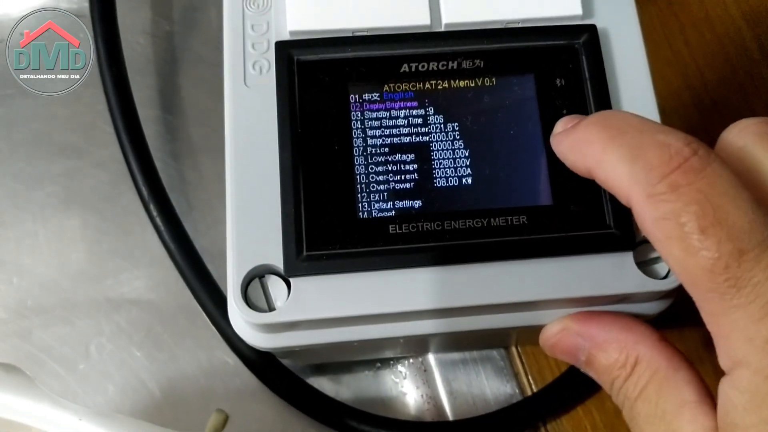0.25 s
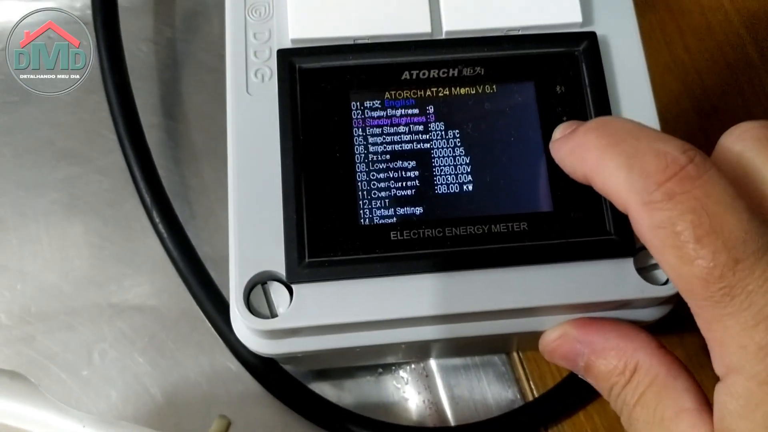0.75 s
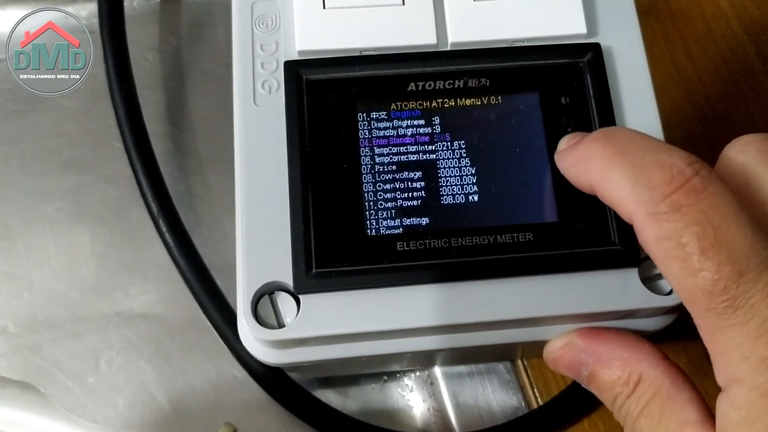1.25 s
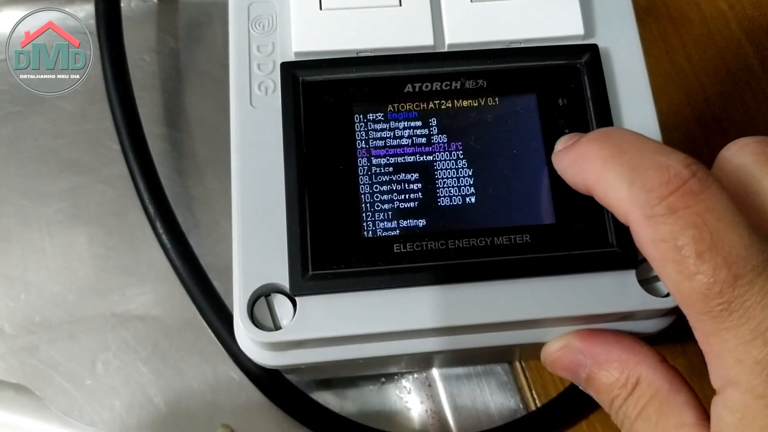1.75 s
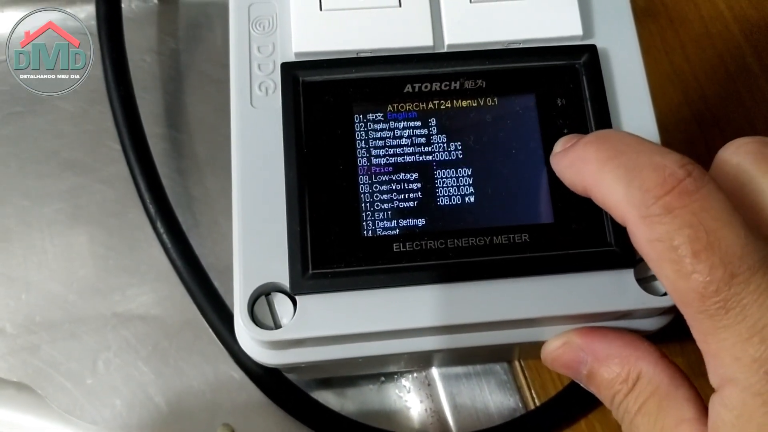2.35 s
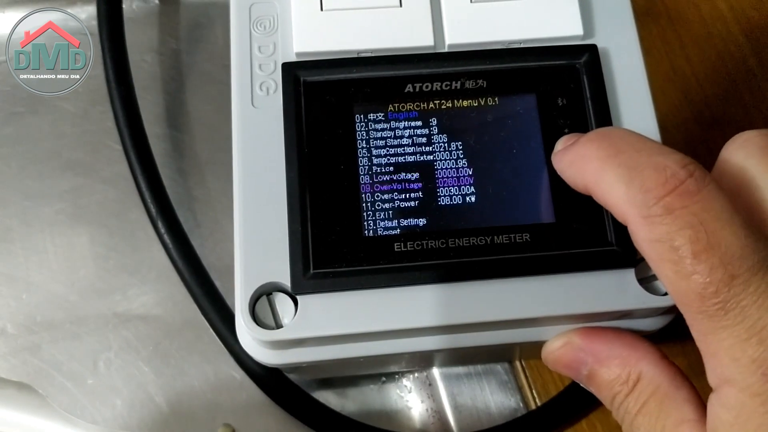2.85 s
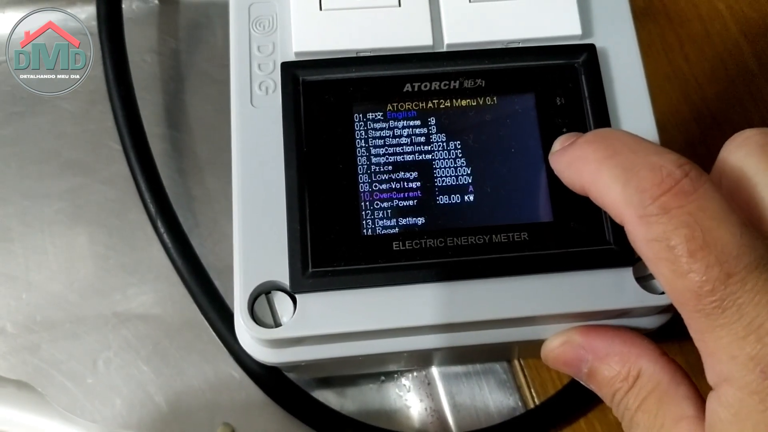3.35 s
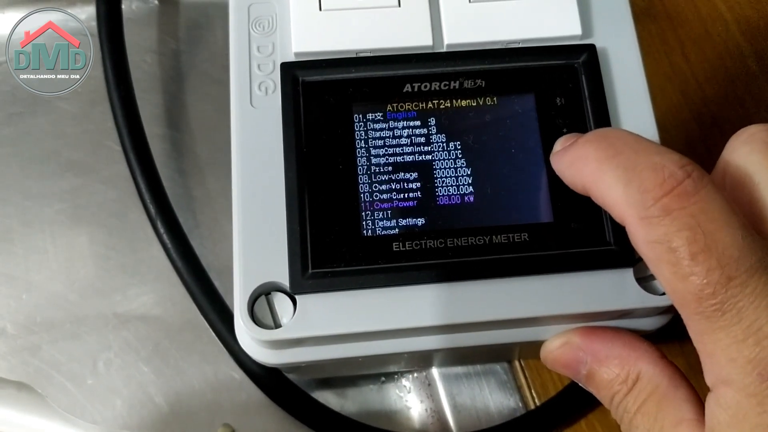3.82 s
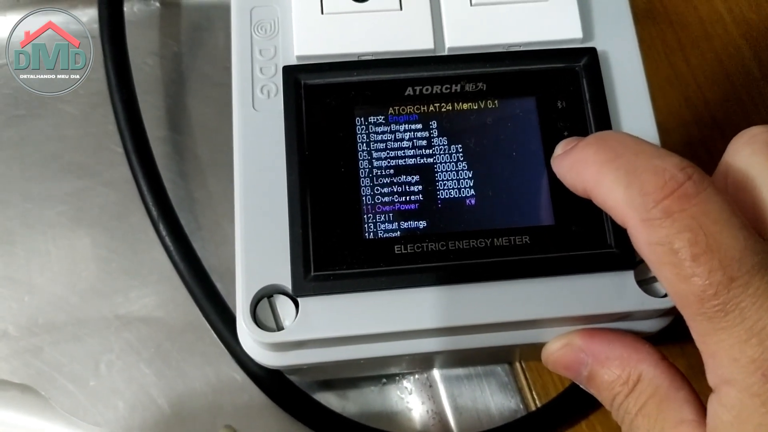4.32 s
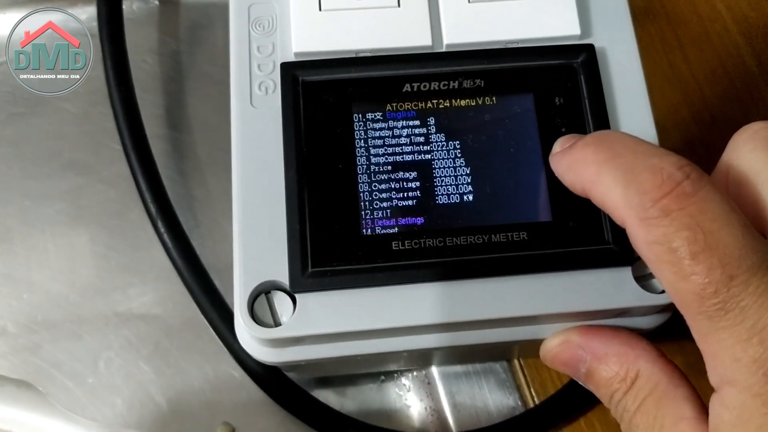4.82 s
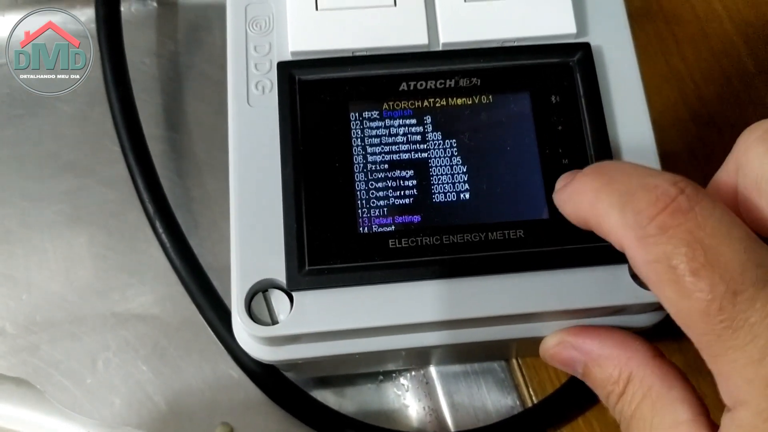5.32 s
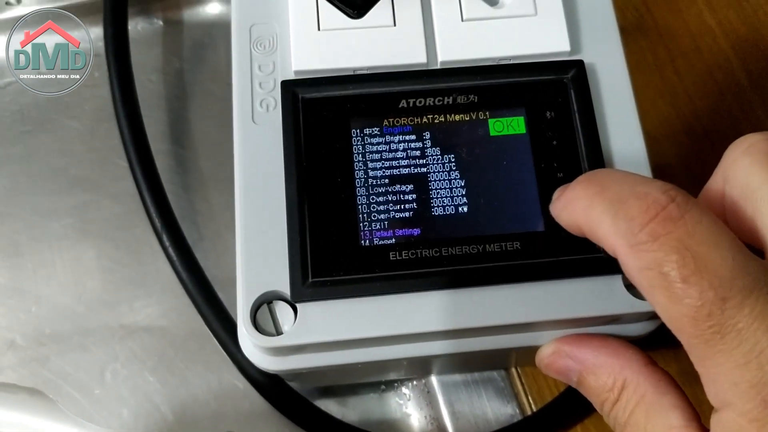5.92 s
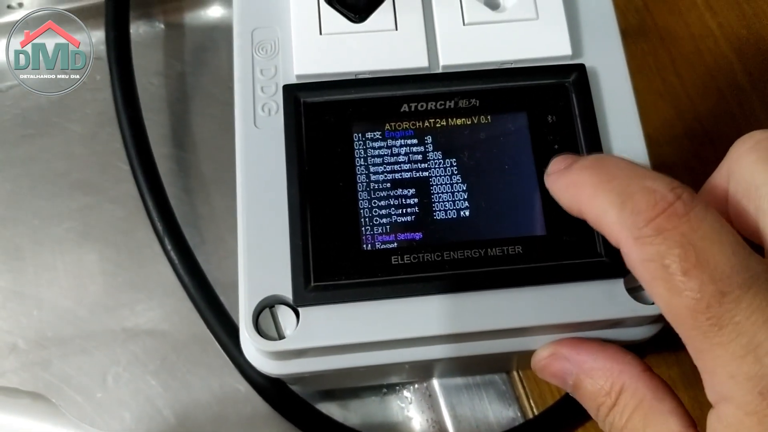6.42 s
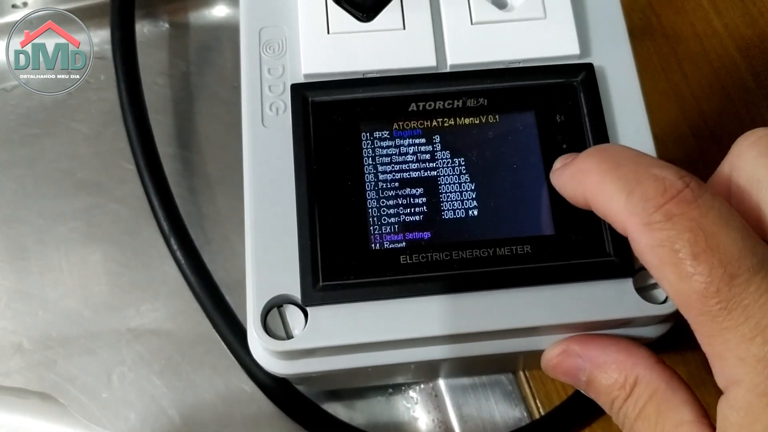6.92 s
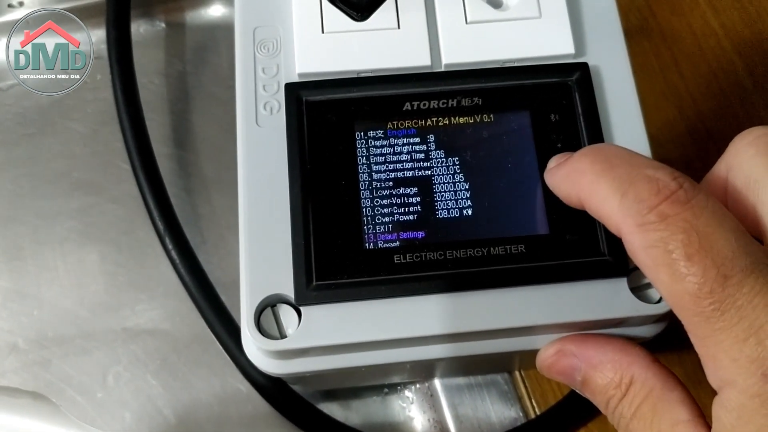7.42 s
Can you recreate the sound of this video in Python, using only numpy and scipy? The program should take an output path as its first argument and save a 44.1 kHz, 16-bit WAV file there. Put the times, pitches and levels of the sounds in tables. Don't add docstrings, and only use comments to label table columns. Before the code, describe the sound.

Close, sharp two-part button clicks in quick succession, slowing to a few brighter snaps, with quiet low hum and soft hiss indoors.

```python
import sys
import numpy as np
from scipy import signal
from scipy.fft import rfft, irfft
from scipy.io import wavfile
from scipy.ndimage import uniform_filter1d

SR = 44100
rng = np.random.default_rng(int(sys.argv[2]) if len(sys.argv) > 2 else 0)


def store_wav(level_fs):
    pcm = np.round(np.clip(np.atleast_2d(level_fs), -1, 1) * 32767)
    wavfile.write(sys.argv[1], SR, pcm.T.astype(np.int16))


def convert_level_to_amplitude(level_db):
    exponent = np.asarray(level_db, float) / 20
    return 10 ** exponent


N = 338202
RING = 8192

# f/Hz, t60/s, left/10^-3, right/10^-3
BASE = [(136.5, 0.17, 13, 13), (185.3, 0.099, -8, -13), (221.1, 0.101, 7, 13), (273.5, 0.15, -22, -21),
        (306.4, 0.16, 9, 13), (364.7, 0.183, 12, 9), (421.0, 0.05, 22, 3), (474.6, 0.121, -2, -5),
        (529.3, 0.13, 2, 12), (580.9, 0.075, 26, 16), (613.0, 0.102, 0, 19)]
CAVITY = [(662.3, 0.06, 54, 80), (672.1, 0.5, -3.2, -1.3), (688.8, 0.23, -13, -8.3),
          (702.2, 0.18, -11.3, -29), (718.9, 0.19, -24, -15), (735.3, 0.45, -0.4, -5)]
LID = [(752.5, 0.071, 56, 12), (846.6, 0.034, 153, 63), (847.6, 0.01, -437, -198), (941.2, 0.076, -4, -21),
       (1048.9, 0.046, -81, -103), (1066.2, 0.099, -6, -35), (1083.8, 0.024, 200, 127)]
FACE = [(1174.5, 0.041, -49, 46), (1184.8, 0.076, 37, -17), (1326.6, 0.042, -13, 33),
        (1513.2, 0.01, -79, -86), (1678.0, 0.04, 31, 13), (1905.0, 0.018, -32, 26), (1958.2, 0.01, 36, -55),
        (2438.0, 0.01, 20, 20)]
# f/Hz, width/Hz, level/dB, rise/s, t60/s
CROWD = [(150, 88, -7, 0.0033, 0.021), (325, 250, -16, 0.004, 0.11), (510, 200, -34, 0.023, 0.5),
         (912, 300, -28.5, 0.004, 0.39), (1257, 99, -6.5, 0.0015, 0.031), (2390, 1470, -12, 0.00036, 0.042),
         (3360, 4500, -10.5, 0.0003, 0.028), (4160, 4000, -33.5, 0.00092, 0.01)]


def unit(x):
    return x / np.sqrt(np.mean(x ** 2))


def band(x, hz, width):
    return signal.lfilter(*signal.iirpeak(min(hz, 20000), hz / width, fs=SR), x)


def double_band(x, hz, width):
    return band(band(x, hz, width), hz, width)


def fade(t, t60):
    return convert_level_to_amplitude(-60 * t / t60)


def walk(rate):
    hold = int(SR / rate)
    steps = np.repeat(rng.standard_normal(N // hold + 1), hold)
    return unit(uniform_filter1d(steps, hold)[:N])


def waver(hz, spread_hz, rate):
    turns = np.cumsum(hz + spread_hz * walk(rate)) / SR
    return np.sqrt(2) * np.sin(2 * np.pi * turns)


def on_log(hz, table):
    row_hz, value = np.transpose(table)
    return np.interp(np.log(hz), np.log(row_hz), value)


def noise(table, level_db):
    # f/Hz, left-right likeness/0-1
    likeness = [(60, 0.91), (130, 0.88), (290, 0.08), (640, 0), (1410, 0), (3100, 0.03), (6820, 0),
                (15000, 0)]
    hz = np.maximum(np.arange(N // 2 + 1) * SR / N, 1)
    alike = np.clip(on_log(hz, likeness), 0, 1)
    spectra = rfft(rng.standard_normal((2, N))) * convert_level_to_amplitude(on_log(hz, table))
    mid, side = spectra * np.sqrt([1 + alike, 1 - alike])
    both = irfft(np.array([mid + side, mid - side]), N)
    return both * convert_level_to_amplitude(level_db) / np.sqrt(np.mean(both.mean(axis=0) ** 2))


def floor():
    # f/Hz, density/dB per Hz
    rumble_colour = [(12, 1.5), (20, -1.5), (29, 2.5), (43, -15.5), (68, -13), (125, -13), (160, -23),
                     (220, -30), (290, -27.5), (480, -28.5), (800, -33), (1500, -42), (2000, -85)]
    hiss_colour = [(800, -34), (1200, -5), (2000, -2.5), (2700, -1), (3100, -6), (5000, -6), (7200, -5),
                   (8000, 0.5), (9000, -2), (10000, -0.5), (10800, -5.5), (13600, -6.5), (14400, -7),
                   (14700, -43)]
    return noise(rumble_colour, -43.5) + noise(hiss_colour, -60.436)


def mains():
    # f/Hz, level/dB
    lines = [(59.3, -50), (118.6, -65), (296.5, -69), (356, -66.5), (474.5, -68.5), (836, -73), (4936, -81)]
    t = np.arange(N) / SR
    hum = 0
    for hz, db in lines:
        level = np.sqrt(2) * convert_level_to_amplitude(db + 0.53 * walk(2.94))
        hum = hum + level * np.sin(2 * np.pi * (hz * t + rng.random()))
    return hum


def motor():
    swells = [
        (0.09, -46.5, 0.067),
        (1.05, -51.5, 0.25),
        (2.2, -48, 0.13),
        (2.72, -45.5, 0.15),
        (3.292, -47, 0.25),
        (4.3, -54, 0.34),
        (5.7, -49.5, 0.43),
        (6.556, -39.5, 0.22),
        (7.01, -47, 0.11),
        (7.497, -54, 0.65),
    ]
    t = np.arange(N) / SR
    load = convert_level_to_amplitude(-60)
    for s, db, half in swells:
        load = load + convert_level_to_amplitude(db) * np.exp(-((t - s) / half) ** 2)
    drone = waver(84, 0.82, rate=7.4) * load * convert_level_to_amplitude(-4.5)
    rumble = unit(double_band(rng.standard_normal(N), 167, 240))
    return drone + rumble * convert_level_to_amplitude(-70.5 + 2 * walk(7.9))


def vehicle():
    # t/s, f/Hz, level/dB
    course = [
        (3.6, 112, -79),
        (4.2, 119.2, -66),
        (5.1, 134.7, -62),
        (5.6, 125, -61),
        (6.201, 150, -70),
        (6.901, 172.1, -64),
        (7.299, 190, -59),
        (7.67, 198.8, -59.5),
    ]
    s, hz, level_db = np.transpose(course)
    t = np.arange(N) / SR
    pitch = np.interp(t, s, hz)
    tones = waver(pitch, 12, rate=53) + convert_level_to_amplitude(-9) * waver(1.5 * pitch, 13.7, rate=26)
    return tones * convert_level_to_amplitude(np.interp(t, s, level_db) + 2.9 * walk(10))


def rub():
    # t/s, level/dB
    stroke = [
        (5.14, -90),
        (5.19, -59),
        (5.24, -58),
        (5.27, -93),
    ]
    level_db = np.interp(np.arange(N) / SR, *np.transpose(stroke))
    return unit(band(rng.standard_normal((2, N)), 9200, 2000)) * convert_level_to_amplitude(level_db)


def room(clicks):
    # f/Hz, t60/s, level/dB
    decays = [(2200, 0.25, -10.5), (5100, 0.34, -14), (9100, 0.6, -60.5)]
    t = np.arange(2 * RING) / SR
    echo = 0
    for hz, t60, db in decays:
        hiss = double_band(rng.standard_normal((2, len(t))), hz, hz)
        echo = echo + convert_level_to_amplitude(db - 29) * hiss * fade(t, t60)
    build = 1 - np.exp(-t / .008)
    return signal.fftconvolve(clicks, echo * build, axes=1)[:, :N]


def case():
    return np.transpose(BASE + CAVITY + LID + FACE)


def parts(base_db, lid_db, face_db):
    counts = [len(BASE), len(CAVITY + LID), len(FACE)]
    return case()[2:] * convert_level_to_amplitude(np.repeat([base_db, lid_db, face_db], counts))


def modes():
    t = np.arange(RING) / SR
    hz, t60 = case()[:2, :, None]
    return np.sin(2 * np.pi * hz * t) * fade(t, t60)


def tilt(hz, bright_db):
    return convert_level_to_amplitude(bright_db * np.log2(hz / 850))


def dense(source):
    t = np.arange(RING) / SR
    layers = []
    for hz, width, db, rise, t60 in CROWD:
        envelope = (1 - np.exp(-t / rise)) * fade(t, t60)
        layers.append(convert_level_to_amplitude(db) * unit(double_band(source, hz, width)) * envelope)
    return layers


def knock(rings, gains, bright_db):
    heard = (gains * tilt(case()[0], bright_db)) @ rings
    return heard / np.max(np.abs(heard.mean(axis=0)))


def tick(chatter, chatter_db):
    # f/Hz, width/Hz, level/dB
    ports = [
        [(10160, 2160, -1), (8420, 940, -4), (11800, 1300, -19), (5650, 1300, -4), (3490, 3000, -11.5)],
        [(7940, 1700, 9), (8400, 900, -10), (12000, 830, -14), (6100, 5500, -2), (3080, 3600, -8.5)],
    ]
    # delay/ms, level/dB, f/Hz
    echoes = [
        [(.6, -9, 9900), (1.9, -6, 9400)],
        [(.65, 0, 8650), (2.1, -6, 8500)],
    ]
    t = np.arange(chatter.shape[1]) / SR
    shape = (1 - np.exp(-t / .0006)) * (fade(t, .038) + .12 * fade(t, .11))
    heard = np.zeros(chatter.shape)
    for ear, (source, port) in enumerate(zip(chatter, ports)):
        heard[ear] = unit(sum(convert_level_to_amplitude(db) * double_band(source, hz, width) for hz, width, db in port))
    heard *= convert_level_to_amplitude(chatter_db - 10.5) * shape
    for ear, arrivals in zip(heard, echoes):
        for ms, db, hz in arrivals:
            since = t - ms / 1000
            swell = np.maximum(since, 0) / .00045
            ear += convert_level_to_amplitude(db) * swell * np.exp(1 - swell) * np.sin(2 * np.pi * hz * since)
    return heard


def button(events, gains, bright_db, chatter_db, steady, crowd_db):
    out, short = np.zeros((2, N + 2 * RING)), RING // 2
    same = rng.standard_normal((2, RING))
    rings = modes()
    for s, knock_db, tick_db, pan_db in events:
        body = knock(rings, gains, bright_db)
        crowd = dense(same + 0.26 * same[::-1] + 0.3 * rng.standard_normal(RING))
        for row, layer in zip(CROWD, crowd):
            body = body + tilt(row[0], crowd_db) * layer
        chatter = same[:, :short] + 0.45 * rng.standard_normal((2, short))
        ears = convert_level_to_amplitude(knock_db + tick_db + 11 + np.array([[pan_db], [-pan_db]]))
        i = int(s * SR)
        left_lag = round(0.00005 * SR)
        for ear, part, lag in zip(out, body, (left_lag, 0)):
            ear[i + lag:i + lag + RING] += convert_level_to_amplitude(knock_db + 5.5) * part
        out[:, i:i + short] += ears * tick(chatter, chatter_db - steady * tick_db)
    return out[:, :N]


def touches():
    # t/s, knock level/dB, tick level above the knock/dB, tick left minus right/dB
    brushes = [
        (4.997, -53, 3.5, 0),
        (5.006, -51, -1, 1),
        (6.005, -44, 3.5, -2.6),
        (6.019, -71, 19, -2.5),
    ]
    bezel = -parts(-3, 0.1, 2.55) / (1 + ((case()[0] - 1350) / 300) ** 2)
    return button(brushes, bezel, bright_db=1.5, chatter_db=1.7, steady=0.01, crowd_db=0.28)


def corner_button():
    # t/s, knock level/dB, tick level above the knock/dB, tick left minus right/dB
    downs = [
        (5.42, -24.5, 10.1, -3),
        (6.705, -25.5, 6.8, -3),
    ]
    backs = [
        (5.617, -23, -17, -0.62),
    ]
    down = button(downs, -parts(1.2, 0.1, -1), bright_db=1, chatter_db=2.7, steady=0.59, crowd_db=-0.65)
    back = button(backs, parts(1, 0.1, -14), bright_db=1.2, chatter_db=-9, steady=1.41, crowd_db=0.1)
    return down + back


def main_button():
    # t/s, knock level/dB, tick level above the knock/dB, tick left minus right/dB
    presses = [(0.037, -20, -2.5, -2.5), (0.669, -20.5, -27, -0.5), (0.994, -21, -8, -1.5),
               (1.406, -21, -9.5, -1), (1.73, -20.5, -5, -2), (2.155, -21, -18, -2), (2.487, -21, -7.5, -1),
               (2.802, -20.5, -7.5, -0.5), (3.11, -21, -16.5, -1.5), (3.536, -21.5, -7, -0.5),
               (4.382, -21, -14, -0.5), (4.773, -21, -9.5, -1.5)]
    releases = [(0.376, -24.5, -2.5, -2), (0.836, -24, 0.5, -2), (1.132, -24, 0, -1.5),
                (1.589, -24, -4, -2), (1.868, -24.5, -5, -2), (2.327, -24.5, -4.5, -3),
                (2.639, -24, -4.5, -3.5), (2.973, -25, -5.5, -2.5), (3.338, -25.5, -5, -1.5),
                (4.218, -26, -4, -1.5), (4.567, -26, -3.5, -2.5)]
    down = button(presses, parts(0.83, 0.17, 0.41),
                  bright_db=0.55, chatter_db=-7, steady=0.9954, crowd_db=-2.04)
    back = button(releases, -parts(-3, 0.1, 2.55),
                  bright_db=0.42, chatter_db=-0.012, steady=-0.032, crowd_db=-0.094)
    return down + back


def scene():
    background = floor() + mains() + motor() + vehicle() + rub()
    clicks = touches() + corner_button() + main_button()
    return background + room(clicks) + clicks


def roll_off(x):
    return signal.sosfilt(signal.butter(12, 16110, fs=SR, output="sos"), x)


def record(dry):
    dull = signal.sosfilt(signal.ellip(4, 1, 26, 14100, fs=SR, output="sos"), dry)
    return roll_off(np.clip(dull, -1, 1))


dry = scene()
out = record(dry)
store_wav(out)
```